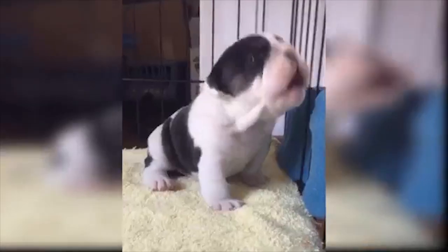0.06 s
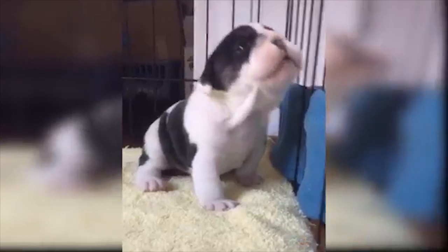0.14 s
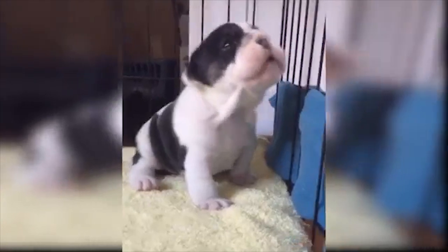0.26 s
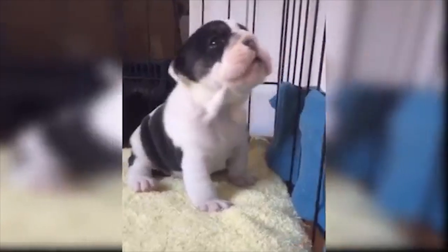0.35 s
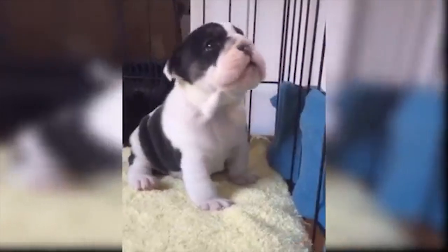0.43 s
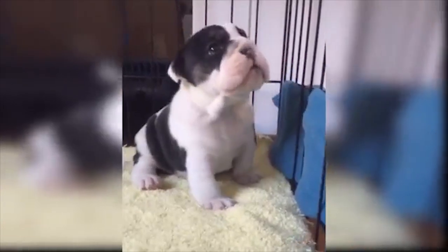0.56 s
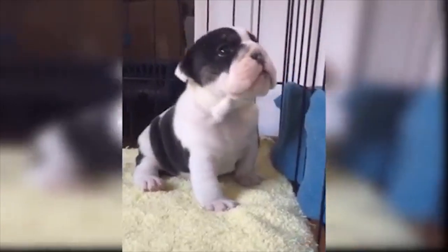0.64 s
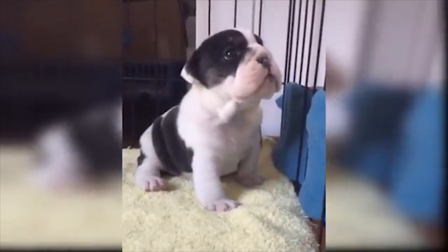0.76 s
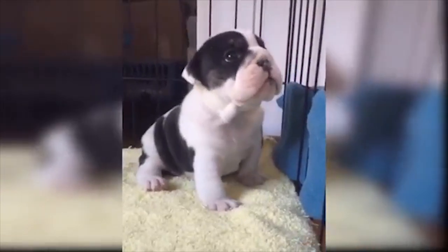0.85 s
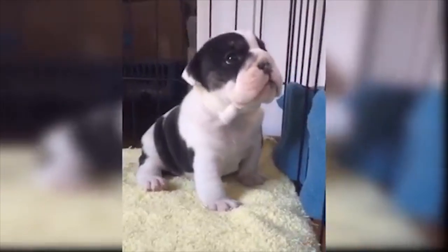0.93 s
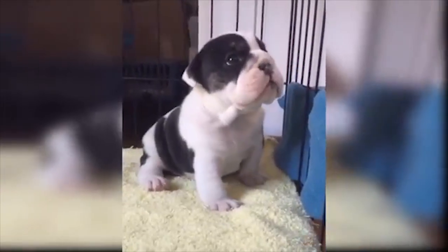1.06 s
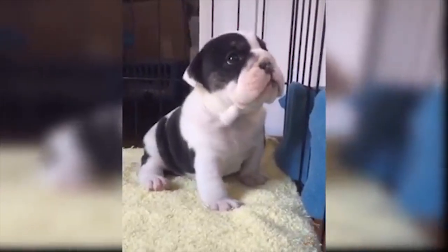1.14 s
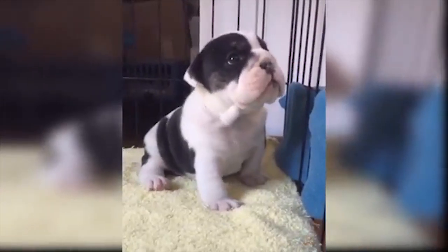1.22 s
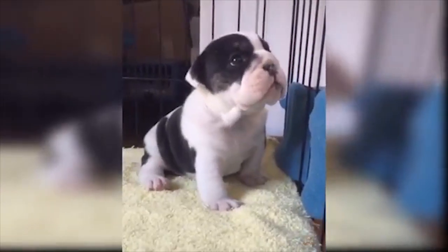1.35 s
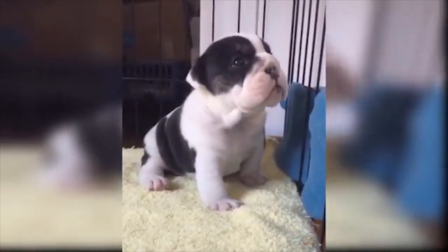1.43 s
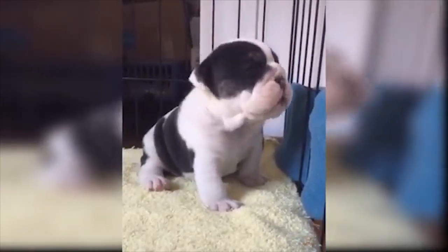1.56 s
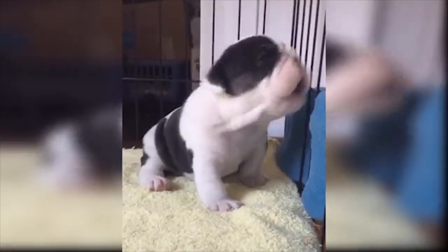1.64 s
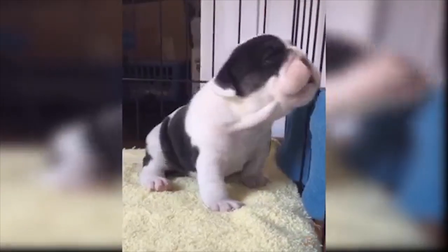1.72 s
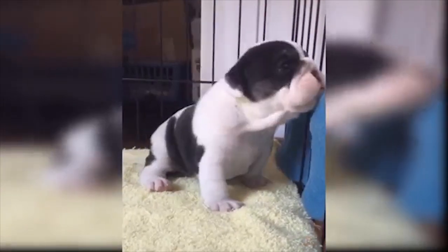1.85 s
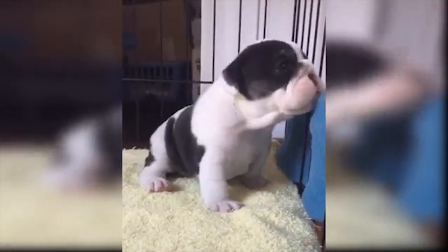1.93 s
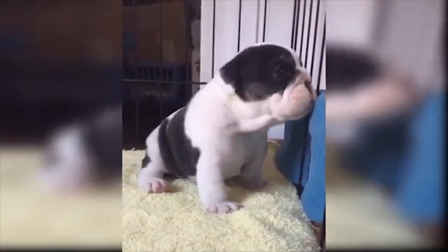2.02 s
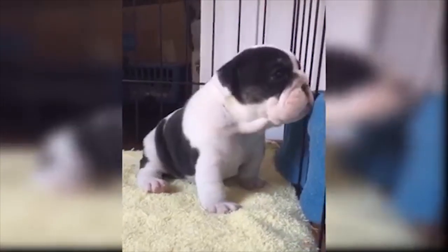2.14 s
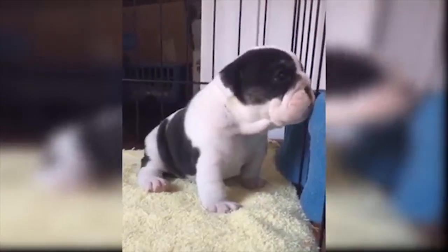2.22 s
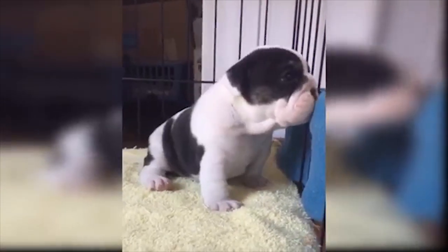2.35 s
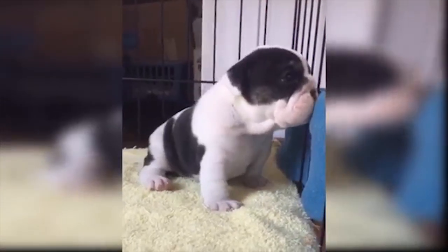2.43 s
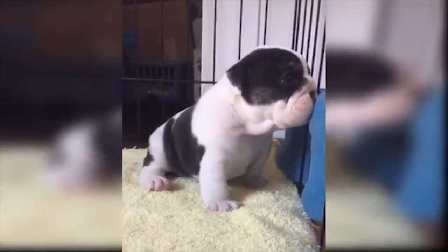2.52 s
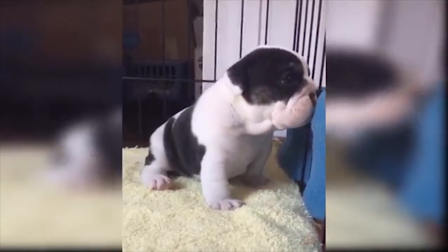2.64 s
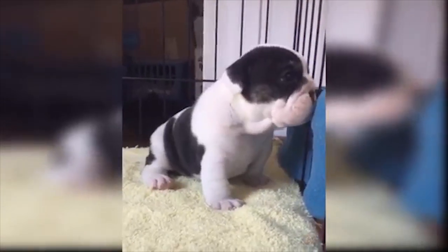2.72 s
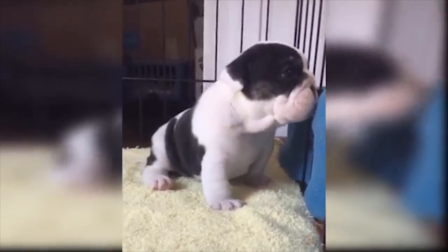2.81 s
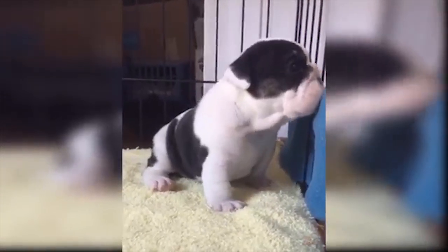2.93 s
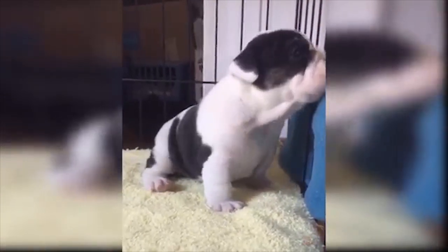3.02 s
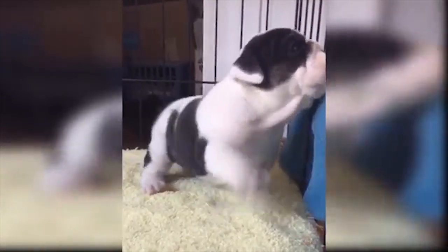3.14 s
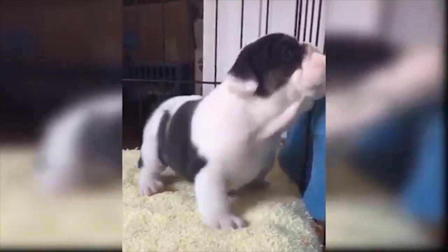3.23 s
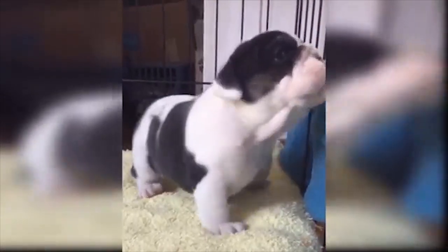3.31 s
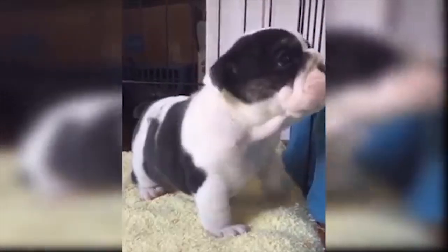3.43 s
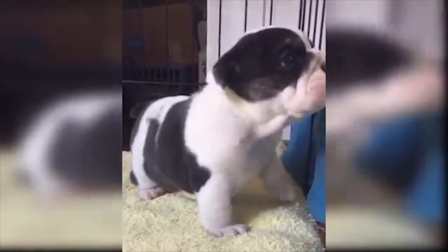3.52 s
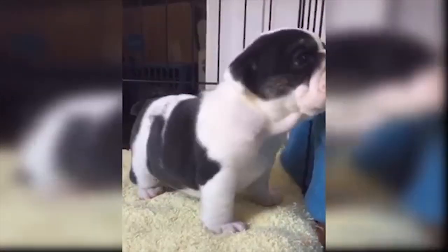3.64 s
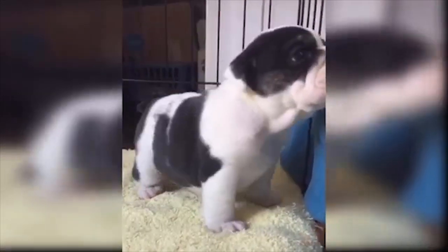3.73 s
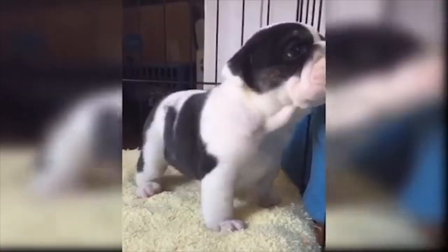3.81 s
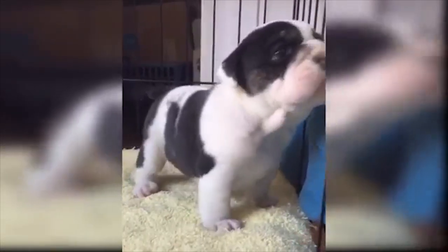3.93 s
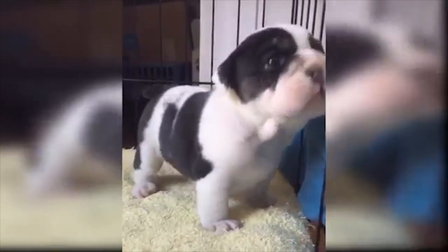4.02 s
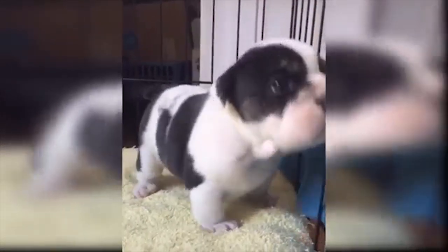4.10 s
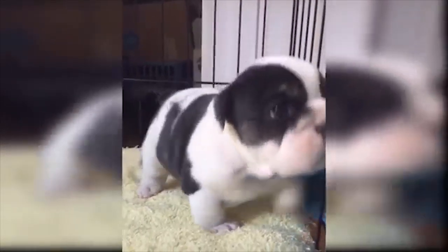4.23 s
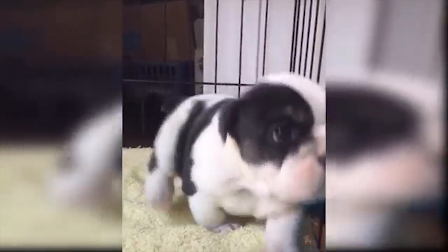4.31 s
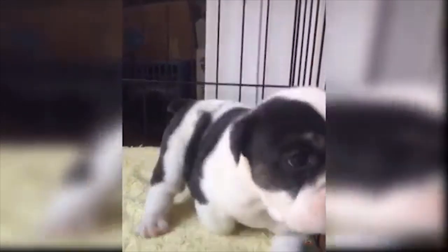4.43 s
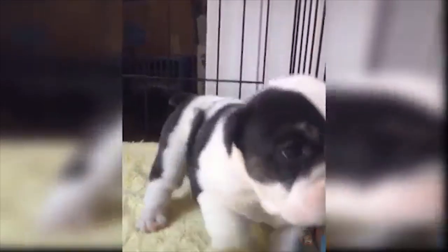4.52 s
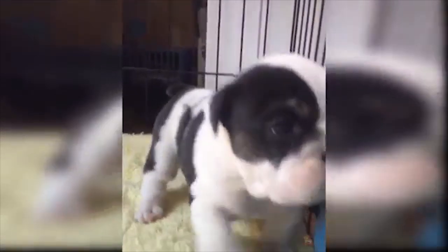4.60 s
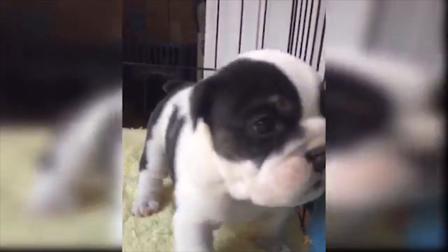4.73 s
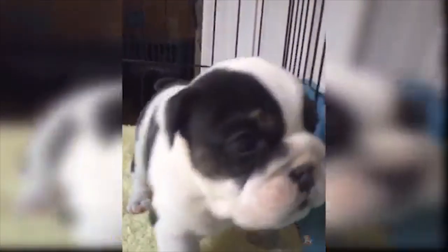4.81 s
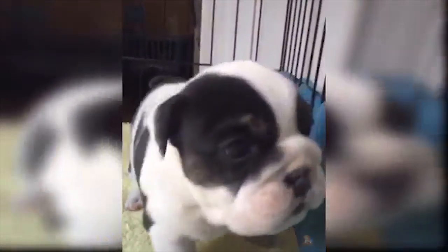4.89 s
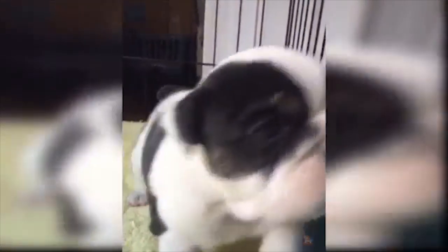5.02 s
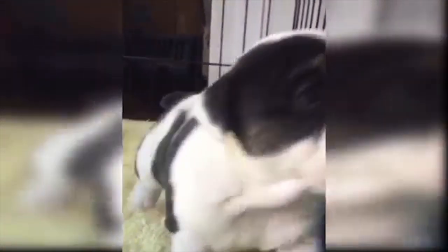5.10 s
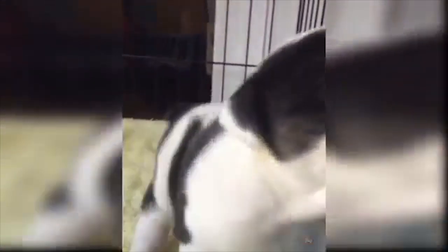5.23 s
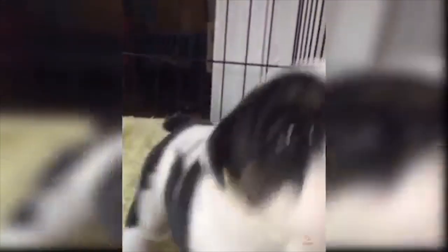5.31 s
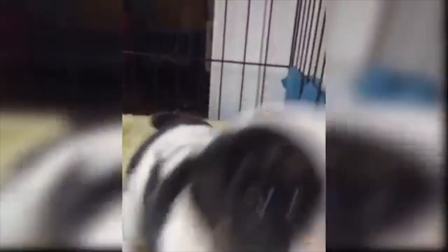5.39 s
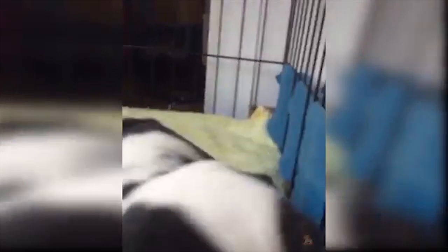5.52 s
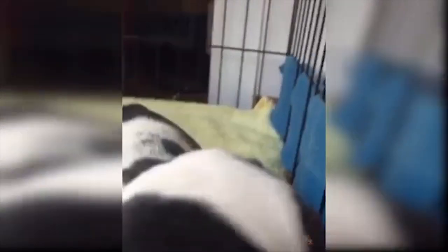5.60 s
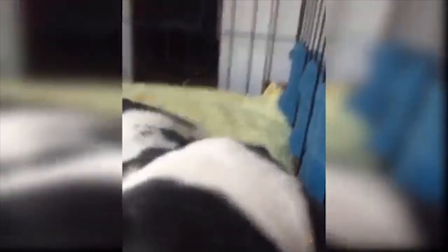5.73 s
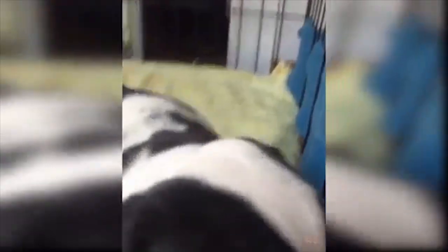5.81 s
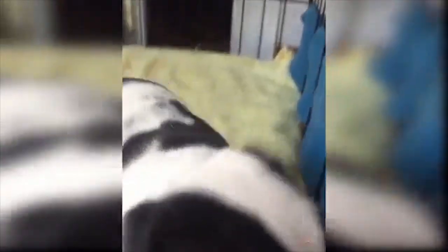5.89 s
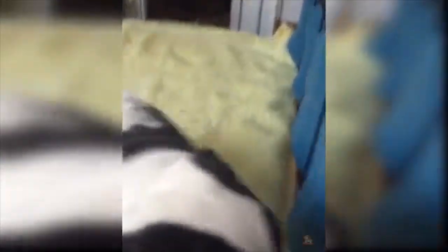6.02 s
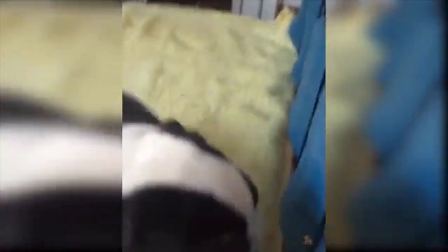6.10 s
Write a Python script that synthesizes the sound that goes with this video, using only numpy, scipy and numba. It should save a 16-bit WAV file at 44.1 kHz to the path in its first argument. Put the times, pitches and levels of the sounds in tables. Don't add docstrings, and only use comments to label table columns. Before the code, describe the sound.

A small puppy gives three separate, very short high yaps, close to a phone microphone. The first is loudest and slightly overloaded; the last is thinner and quieter. Each rings briefly in a small room. Low fan noise and mains hum lie underneath. Near the end the puppy shuffles over a blanket, nudges the phone with dull knocks and lightly rattles wire.

```python
import sys
import numpy as np
from scipy import signal
from scipy.fft import rfft, irfft
from scipy.io import wavfile
from scipy.ndimage import uniform_filter1d
from numba import njit

SR = 44100
rng = np.random.default_rng(int(sys.argv[2]) if len(sys.argv) > 2 else 0)


def rack_gain(trim_db):
    fader = np.asarray(trim_db, float)
    return 10 ** (fader / 20)


def pcm_store(signal):
    levels = np.round(np.clip(np.atleast_2d(signal), -1, 1) * 32767)
    wavfile.write(sys.argv[1], SR, levels.astype(np.int16).T)


N = 271391
T = np.arange(N) / SR


def unit(x):
    return x / np.sqrt(np.mean(x ** 2))


@njit
def moving_band(x, hz, width):
    y, b, l = np.empty(len(x)), 0., 0.
    for i in range(len(x)):
        g, k = np.tan(np.pi * hz[i] / SR), width / hz[i]
        v = (b + g * (x[i] - l)) / (1 + g * (g + k))
        b, l, y[i] = 2 * v - b, l + 2 * g * v, k * v
    return y


def band(x, hz, width):
    return moving_band(x, np.full(len(x), 1. * hz), 1. * width)


def walk(rate, size):
    hold = int(SR / rate)
    steps = np.repeat(rng.standard_normal(size // hold + 1), hold)
    return 1.3 * uniform_filter1d(uniform_filter1d(steps, hold), hold)[:size]


def add(out, s, x):
    i = int(s * SR)
    out[i:i + len(x)] += x[:len(out) - i]


def vocal_folds(t, hz, rough, pairs):
    wander = .12 * walk(600, len(t)) + .09 * walk(170, len(t))
    turn = np.cumsum(np.pi * hz * (1 + rough * wander) / SR)
    k = np.arange(1, 57)[:, None]
    share = np.where(k % 2, pairs, 1) * (k * hz < 30000)
    pulses = np.sum(share * k ** -.4 * np.cos(k * turn), axis=0)
    uneven = rack_gain(7 * rough * walk(450, len(t)))
    breath = rng.standard_normal(len(t)) * (1 + .7 * np.cos(2 * turn))
    return (1 - rough) * uneven * unit(pulses) + (.04 + .6 * rough) * breath, breath


def steep(x, modes, shift):
    out = 0
    for j, (hz, width, db) in enumerate(modes):
        once = band(x, hz * shift, 1.7 * width)
        out = out + (-1) ** j * rack_gain(db) * band(once, hz * shift, 1.7 * width)
    return out


# pitch_hz, width_hz, level_db
TEETH = [
    (3323, 1200, -9.5),
    (4240, 550, -3.5),
]
# pitch_hz, width_hz, level_db
LIPS = [
    (6480, 1100, -11.5),
    (8840, 2100, -15.5),
    (11837, 1700, -25),
]
# pitch_hz, width_hz, level_db
CHEST = (610, 1126, -15)
# pitch_hz, width_hz, level_db
PALATE = (2050, 270, 3)


def mouth_and_throat(folds, breath, mouth_hz, throat_hz, shift, hiss_db, throat_db, bite_db):
    jaw_hz = [950, 1650]
    throat_db = throat_db + np.interp(mouth_hz, jaw_hz, [-2, -3.5])
    bite_db = bite_db + np.interp(mouth_hz, jaw_hz, [-16.5, 0])
    mouth_width_hz, throat_width_hz = 420., 300.
    voice = moving_band(moving_band(folds, mouth_hz, 3.3 * mouth_width_hz), mouth_hz, mouth_width_hz)

    chest_hz, chest_width_hz, chest_db = CHEST
    voice -= rack_gain(chest_db) * band(band(folds, chest_hz, chest_width_hz), chest_hz, chest_width_hz)

    throat = moving_band(folds, throat_hz, 2 * throat_width_hz)
    voice -= rack_gain(throat_db) * moving_band(throat, throat_hz, throat_width_hz)

    palate_hz, palate_width_hz, palate_db = PALATE
    closing_db = np.interp(throat_hz, [palate_hz, 2550], [0, -22])
    palate = band(band(folds, palate_hz, 2 * palate_width_hz), palate_hz, palate_width_hz)
    voice -= rack_gain(palate_db + closing_db) * palate

    airy = .7 * folds + .3 * breath
    return voice + rack_gain(bite_db) * (steep(folds, TEETH, shift) + rack_gain(hiss_db) * steep(airy, LIPS, 1))


def bark(table, hoarse, broken, jaw):
    s, *columns = np.transpose(table)
    t = np.arange(s[0], s[-1], 1 / SR)
    hz, db, mouth_hz, throat_hz = (uniform_filter1d(np.interp(t, s, c), size=200) for c in columns)
    lock_s, rough_before, slack_s, rough_after = hoarse
    break_s, mend_s, pair_share, rough_broken = broken
    breaking = (t > break_s) & (t < mend_s)
    rough = np.select([breaking, t < lock_s, t > slack_s], [rough_broken, rough_before, rough_after], .06)
    rough, pairs = (uniform_filter1d(c, size=300) for c in (rough, breaking * pair_share))
    hz = hz * (1 - .2 * pair_share * np.exp(-((t - mend_s) / .006 + 1) ** 2))
    folds, breath = vocal_folds(t, hz, rough, pairs)
    voice = mouth_and_throat(folds, breath, mouth_hz, throat_hz, *jaw)
    level = np.sqrt(uniform_filter1d(voice ** 2, size=900) + 1e-9)
    fade = np.minimum(np.minimum(t - s[0], s[-1] - t) / .006, 1)
    return fade * voice * rack_gain(db) / level


# time_s, fold_rate_hz, level_db, mouth_hz, throat_hz
FIRST_YAP = [(.208, 435.7, -25.5, 980, 1860), (.228, 680.7, -4, 1460, 2050), (.241, 808, 2, 1633, 2485),
             (.252, 848.3, 0, 1710, 2490), (.258, 984.6, -1.5, 1860, 3030), (.302, 935, -3.5, 1770, 2900),
             (.314, 780.6, -7.5, 1426, 2941), (.350, 504, -13.5, 1042, 2050),
             (.416, 345.6, -27.5, 900, 2150)]
SECOND_YAP = [(1.716, 484.2, -35.5, 944, 2058), (1.765, 538.6, -12, 994, 1940),
              (1.771, 630.3, -5, 1240, 1880), (1.800, 850.7, -4, 1650, 2500),
              (1.824, 937.8, 0.5, 1830, 2800), (1.851, 862, -9, 1700, 2598), (1.868, 703.2, -5, 1450, 2762),
              (1.905, 428.4, -18, 1150, 2142), (1.942, 365.5, -31, 900, 2250)]
THIRD_YAP = [(3.245, 626, -22, 800, 2050), (3.264, 793, -18.5, 800, 2190), (3.271, 1020, -10.5, 1000, 2047),
             (3.279, 894.5, -11.5, 1350, 2703), (3.305, 1032, -11, 1400, 2841),
             (3.316, 897.4, -7.5, 955, 2720), (3.336, 906, -13, 910, 2300), (3.382, 916.4, -22, 900, 2160),
             (3.401, 700, -34.5, 740, 1900)]
# lock_s, rough_before (0-1), slacken_s, rough_after (0-1)
HOARSE = [
    (.222, .4, .36, .1),
    (1.768, .7, 1.89, .3),
    (3.25, .4, 3.34, .36),
]
# start_s, end_s, pair_share (0-1), roughness (0-1)
BREAKS = [
    (.253, .308, .45, .38),
    (1.775, 1.79, .2, .06),
    (3.276, 3.353, .88, .08),
]
# teeth_shift (factor), lip_hiss_db, throat_db, bite_db
JAWS = [
    (1.0, 0, 2.5, 0.5),
    (1.01, 0, 1.5, 1.5),
    (1.21, -3, 5.5, 1),
]


def puppy():
    out = np.zeros(N)
    for table, hoarse, broken, jaw in zip((FIRST_YAP, SECOND_YAP, THIRD_YAP), HOARSE, BREAKS, JAWS):
        add(out, table[0][0], bark(table, hoarse, broken, jaw))
    return out


# delay_s, level_db
ECHOES = [
    (.0031, -9),
    (.0074, -16),
    (0.0137, -11),
]
# pitch_hz, t60_s, level_db
ROOM = [(700, .28, -26), (1400, .26, -24), (1450, .65, -37), (2750, .24, -27), (2550, .45, -37),
        (4200, .38, -32), (6500, .15, -19), (10500, .14, -19)]


def room(x):
    t = T[:SR]
    tail = 0
    for hz, t60, db in ROOM:
        hiss = unit(band(rng.standard_normal(SR), hz, .5 * hz))
        tail = tail + rack_gain(db) * hiss * rack_gain(-60 * t / t60) * np.sqrt(14 / t60 / SR)
    blur = unit(walk(170, N))
    out = x + signal.fftconvolve(x * blur, tail * np.minimum(t / 0.004, 1))[:N]
    for lag, db in ECHOES:
        add(out, lag, rack_gain(db) * uniform_filter1d(x, size=2))
    return out


# start_s, peak_db, rise_s, t60_s
FUR = [(1.22, -58.5, 0.0036, .06), (4.59, -59, .025, .12), (5.255, -53.5, .02, .4),
       (5.361, -53, .004, 0.22), (5.402, -42, 0.0033, 0.22), (5.412, -38.5, .001, 0.096),
       (5.536, -58, 0.017, 0.42), (5.645, -32.5, 0.00092, 0.19), (5.735, -49, 0.0036, 0.18),
       (5.845, -60.5, .006, 0.14)]
# start_s, peak_db, pitch_hz, rise_s, t60_s
SNORTS = [(.383, -36, 9100, 0.0035, .1), (.65, -53, 1477, .02, .3), (1.24, -51.5, 2100, .01, .1),
          (1.38, -65, 12500, 0.0095, .1), (2.88, -69, 11000, .03, .2), (3.245, -43, 11600, .004, 0.3),
          (3.245, -41, 6800, .004, .5), (4.20, -52, 2000, .005, 0.067), (5.02, -53, 7730, 0.018, 0.11),
          (5.02, -59, 12000, .02, .1), (5.262, -55, 8300, 0.014, 0.31), (5.265, -50, 2000, 0.029, .25),
          (5.275, -51, 3500, 0.02, 0.23), (5.27, -57, 6600, 0.034, 0.22), (5.355, -52, 1640, .01, 0.42)]
# start_s, peak_db, pitch_hz, rise_s, t60_s
PAWS = [(5.243, -43, 600, 0.014, 0.15), (5.405, -39.5, 1500, 0.0059, 0.2),
        (5.405, -35.5, 283, 0.006, 0.353), (5.54, -52, 1990, 0.019, 0.27),
        (5.647, -37.5, 1373, 0.0031, 0.19), (5.65, -30, 407, .004, 0.48), (5.845, -51.5, 2193, .006, 0.14)]


def shuffle():
    out, t = np.zeros(N), T[:SR // 2]
    rustles = [(s, db, 7000, 13600, *fade) for s, db, *fade in FUR]
    for table, width_share in ((SNORTS, .2), (PAWS, 1.2)):
        rustles += [(s, db, hz, width_share * hz, *fade) for s, db, hz, *fade in table]
    for s, db, hz, width, rise, t60 in rustles:
        grains = rng.standard_normal(len(t)) * rack_gain(1.5 * walk(600, len(t)))
        shape = np.minimum(t / rise, 1) ** 2 * rack_gain(-60 * np.maximum(t - rise, 0) / t60)
        rub = band(band(grains, hz, 1.25 * width), hz, 1.25 * width)
        add(out, s, rack_gain(db) * shape * unit(rub))
    return out


# start_s, level_db, softness_s
KNOCKS = [
    (5.247, -29, 0.0061),
    (5.356, -40.5, 0.019),
    (5.53, -45.5, 0.0041),
    (5.647, -21, 0.00097),
]
# pitch_hz, level_db, t60_s
CASE = [
    (285, 2.5, 0.051),
    (619, 13, 0.027),
    (744, 15, 0.016),
    (1150, 2, 0.066),
    (1650, -14, 0.015),
]


def bumps():
    out, t = np.zeros(N), T[:SR // 2]
    ring = sum(rack_gain(db - 60 * t / t60) * np.sin(2 * np.pi * hz * t) for hz, db, t60 in CASE)
    for s, db, soft in KNOCKS:
        push = t[:1500] * np.exp(-t[:1500] / soft) * uniform_filter1d(rng.standard_normal(1500), size=9)
        push /= np.sqrt(np.sum(push ** 2))
        add(out, s, rack_gain(db) * signal.fftconvolve(ring, push)[:len(t)] / 6)
    return out


# start_s, level_db, scrape_s
RATTLES = [
    (5.26, -52.5, 0.046),
    (5.365, -57, 0.03),
    (5.412, -58, .03),
    (5.647, -45, 0.017),
    (5.736, -55, 0.017),
]
# pitch_hz, level_db, t60_s
WIRES = [(1750, -3, .04), (2330, 0, .04), (3400, -4, .03), (4590, -2, .03), (5265, -4, .03),
         (5930, -3, .03), (6900, -3, .02), (8400, -2, .02), (9300, -2, .02), (10200, -3, .04)]


def rattle():
    out, t = np.zeros(N), T[:SR // 2]
    for s, db, length in RATTLES:
        chance = rng.standard_normal((len(WIRES), 2))
        ring = 0
        for (hz, wire_db, t60), (louder, sharper) in zip(WIRES, chance):
            tone = np.sin(2 * np.pi * hz * (1 + 0.017 * sharper) * t)
            ring = ring + rack_gain(wire_db + 3.7 * louder - 60 * t / t60) * tone
        scrape = np.exp(-t / length) * rng.standard_normal(len(t))
        scrape /= np.sqrt(np.sum(scrape ** 2))
        add(out, s, rack_gain(db) * signal.fftconvolve(ring, scrape)[:len(t)])
    return out


# pitch_hz, level_db (per Hz)
FAN = [(20, -44), (45, -14), (170, -6), (410, -24), (620, -7), (1050, -19), (2100, -33.5), (13000, -51.5)]
# pitch_hz, level_db (rms)
HUM = [
    (60, -52),
    (120, -51.5),
]
# time_s, bass_change_db
COVER = [
    (5.33, 8.5),
    (5.36, 11),
    (5.54, 9),
    (5.57, -1),
    (5.63, -21),
    (5.68, -5.5),
    (5.76, 5.5),
]


def fan_and_hum():
    hz, db = np.transpose(FAN)
    f = np.fft.rfftfreq(N, 1 / SR) + 1e-3
    spectrum = rfft(rng.standard_normal(N)) * rack_gain(np.interp(np.log(f), np.log(hz), db))
    swell, fan = walk(0.98, N), 0
    for octave in np.arange(4.5, 14.1, .5):
        part = np.clip(1 - np.abs(np.log2(f) - octave) * 2, 0, 1)
        flicker_db = 1.8 * min(2 ** (9.5 - octave), 1) * walk(7, N)
        fan = fan + irfft(spectrum * part, N) * rack_gain(.4 * swell + flicker_db)
    waver_db = 2.5 * walk(11, N)
    out = unit(fan) * rack_gain(-45)
    out += sum(rack_gain(db + 2.5 + waver_db) * np.sin(2 * np.pi * hz * T) for hz, db in HUM)
    bass = signal.sosfilt(signal.butter(2, 450, fs=SR, output="sos"), out)
    return out + bass * (rack_gain(np.interp(T, *np.transpose(COVER))) - 1)


def scene():
    yaps = rack_gain(-0.5) * room(puppy())
    return (yaps + shuffle() + bumps() + rattle() + fan_and_hum())[None]


def top_cut(x):
    return signal.sosfilt(signal.butter(12, 15000, fs=SR, output="sos"), x)


def record(dry):
    rumble_cut = signal.butter(2, 38, "high", fs=SR, output="sos")
    treble_cut = signal.ellip(10, .3, 60, 13150, fs=SR, output="sos")
    heard = signal.sosfilt(np.vstack([rumble_cut, treble_cut]), dry)
    return top_cut(np.clip(heard, -.98, .98))


dry = scene()
out = record(dry)
pcm_store(out)
```